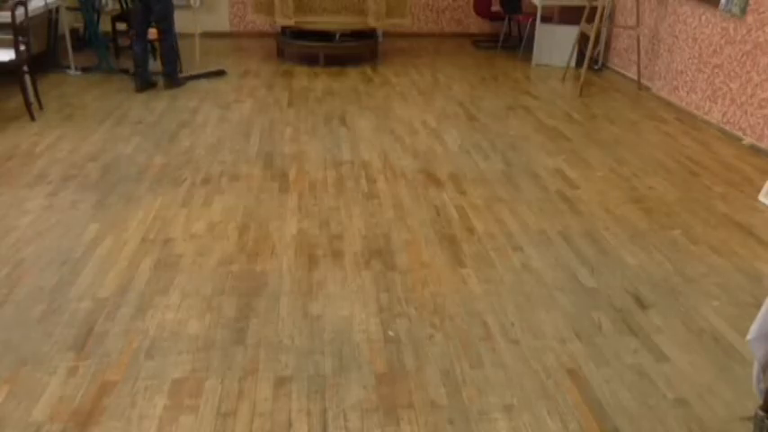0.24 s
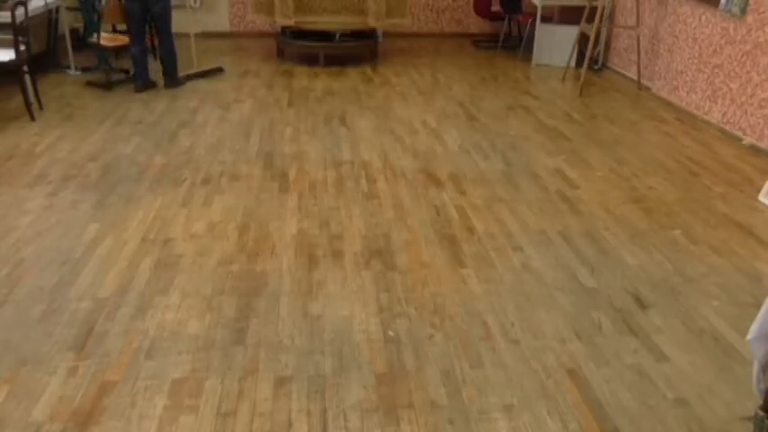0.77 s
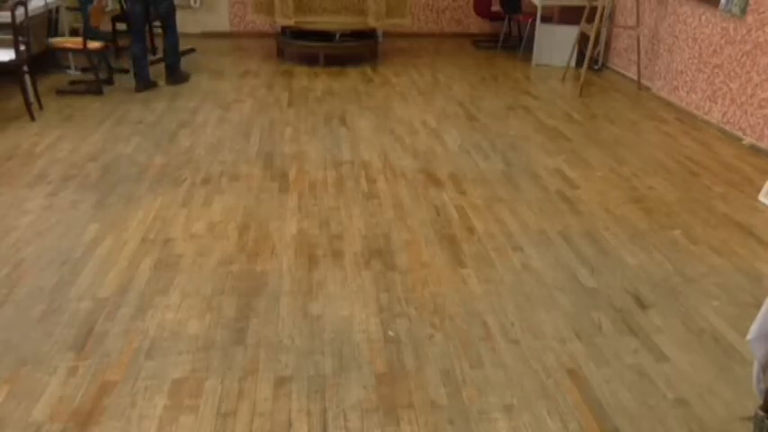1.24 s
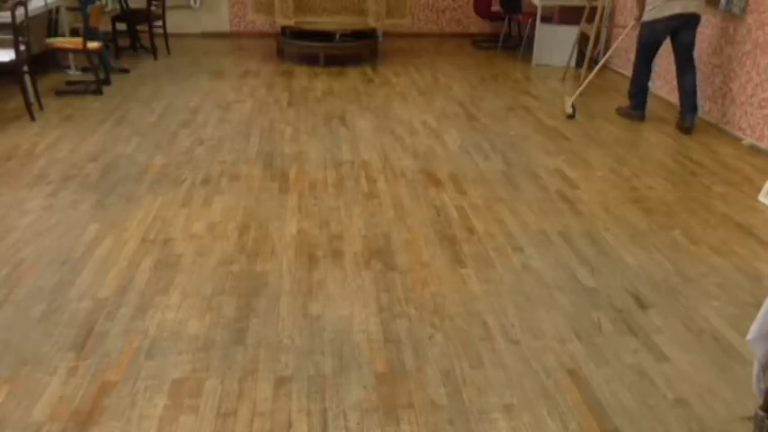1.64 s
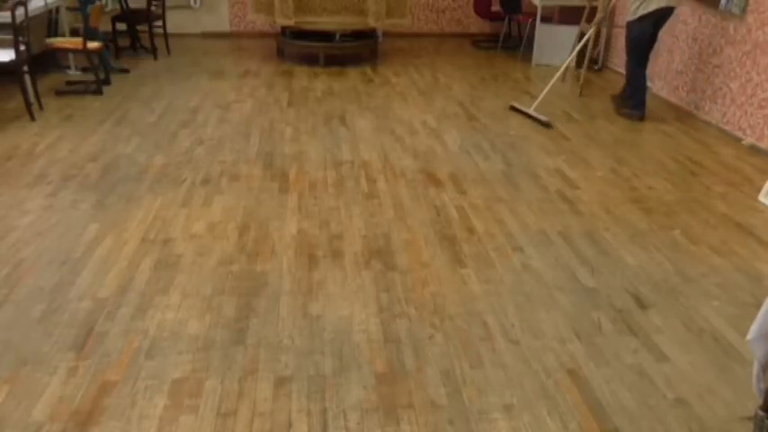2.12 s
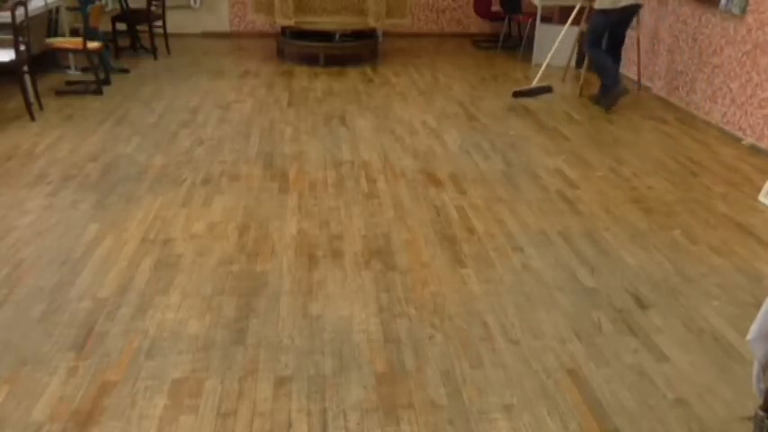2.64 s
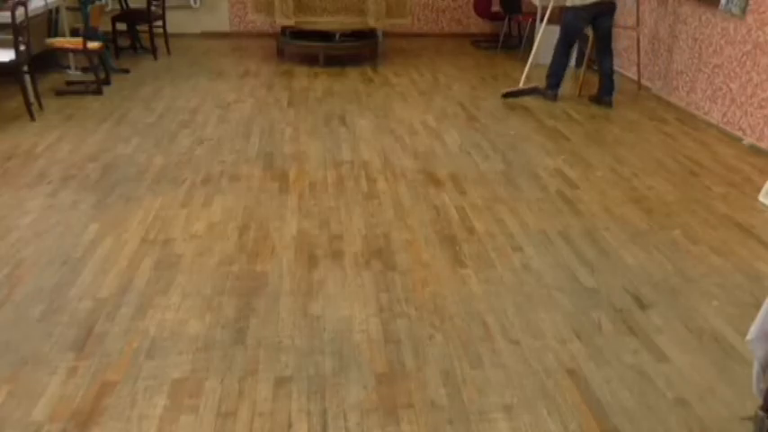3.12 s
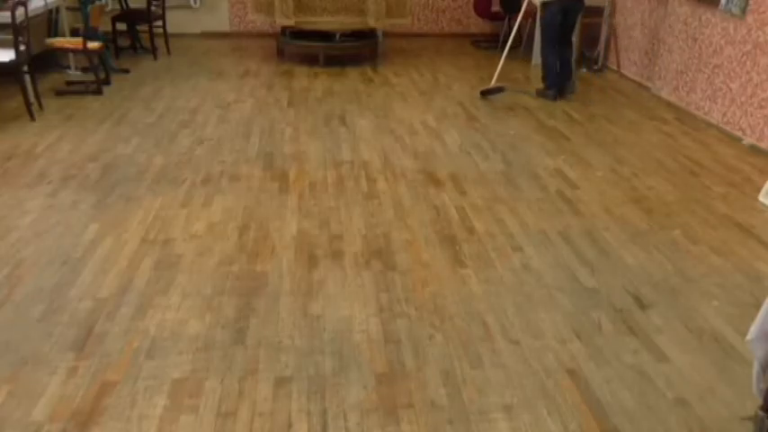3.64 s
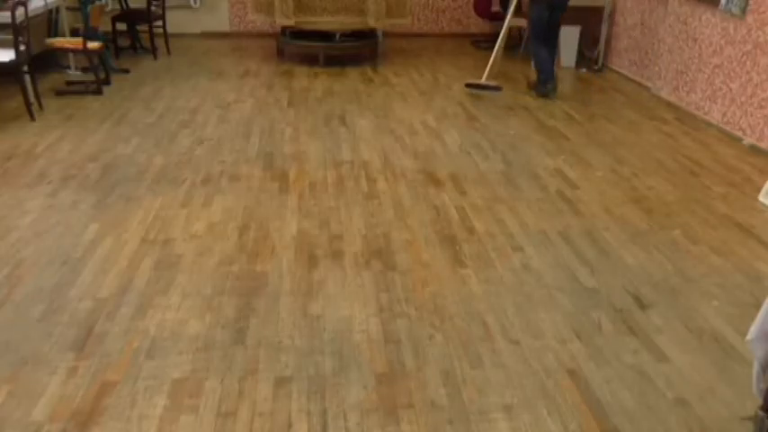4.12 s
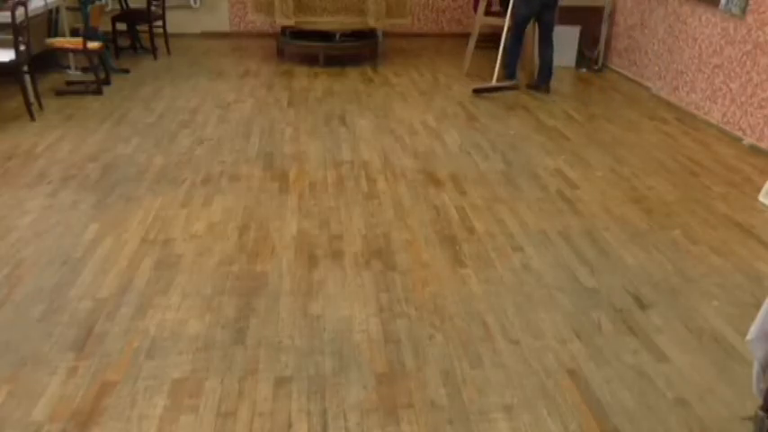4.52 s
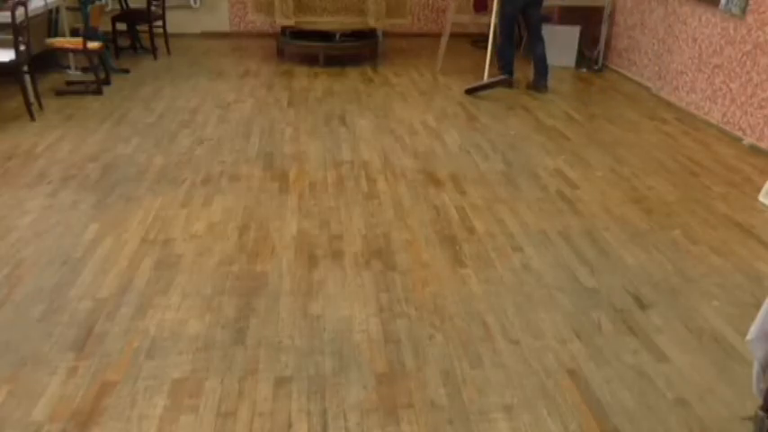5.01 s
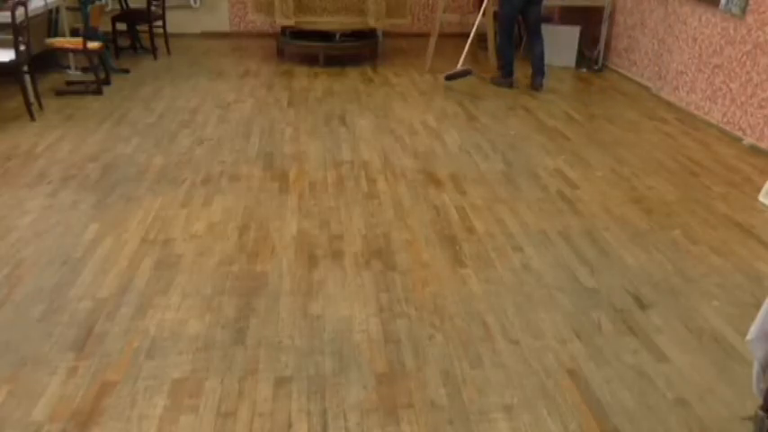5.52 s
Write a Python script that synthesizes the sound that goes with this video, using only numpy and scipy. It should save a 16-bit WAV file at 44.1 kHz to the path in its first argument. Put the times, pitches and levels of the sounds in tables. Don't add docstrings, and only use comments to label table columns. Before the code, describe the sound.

A push broom hisses and scrapes across a wooden floor in a large empty hall, with a burst of hard wooden knocks midway.

```python
import sys
import numpy as np
from scipy import signal
from scipy.fft import rfft, irfft, next_fast_len
from scipy.io import wavfile
from scipy.ndimage import uniform_filter1d

SR = 44100
rng = np.random.default_rng(int(sys.argv[2]) if len(sys.argv) > 2 else 0)


def wrap_up_sound(samples):
    columns = np.atleast_2d(samples).T
    tamed = np.clip(columns, -1, 1)
    steps = np.round(tamed * 32767).astype(np.int16)
    wavfile.write(sys.argv[1], SR, steps)


def volts_from_db(level):
    exponent = np.asarray(level, float) / 20
    return 10 ** exponent


N = 254456


def unit(x):
    return x / np.sqrt(np.mean(x ** 2) + 1e-20)


def peak_one(x):
    return x / np.abs(x).max()


def along(points, hz):
    f, value = np.transpose(points)
    return np.interp(np.log(hz + 1), np.log(f + 1), value)


def filtered(x, response):
    m = next_fast_len(x.shape[-1] + 8192)
    hz = np.fft.rfftfreq(m, 1 / SR)
    return irfft(rfft(x, m) * response(hz), m)[..., :x.shape[-1]]


def resonance(f, hz, width_hz):
    return 1j * f * width_hz / (hz * hz - f * f + 1j * f * width_hz)


def favoured(hz):
    # (frequency [Hz], width [Hz], lift [dB])
    standing_waves = [(157.6, 11, 3), (263, 22, 2), (334, 15, 3), (604, 17, 2.5), (724, 20, 0.5),
                      (860, 25, 1)]
    return volts_from_db(sum(db * np.abs(resonance(hz, c, w)) ** 2 for c, w, db in standing_waves))


def spread(pair, colour, apart):
    # (frequency [Hz], correlation [-1..1])
    likeness = [(60, 0.89), (150, 0.9), (300, 0.86), (600, 0.59), (1200, 0.57), (2400, 0.53), (5000, 0.69),
                (9000, 0.54), (15000, 0.64)]

    def mid_side(hz):
        angle = apart * np.arccos(np.clip(along(likeness, hz), -1, 1)) / 2
        return colour(hz) * [np.cos(angle), np.sin(angle)]

    mid, side = filtered(pair, mid_side)
    return np.array([mid + side, mid - side])


def pressure(s, rise_s, hold_s, db, fade_db_per_s):
    rise_from_db = -25
    t = np.arange(0, N + 32, 32)[:, None] / SR
    rise_db = rise_from_db * np.maximum(s - t, 0) / rise_s
    fade_db = fade_db_per_s * np.maximum(t - s - hold_s, 0)
    power = volts_from_db(2 * np.maximum(db + rise_db - fade_db, -150)).sum(axis=1)
    return np.interp(np.arange(N) / SR, t[:, 0], power)


def rub(spectrum, grain_db, grain_ms, patchy_db, apart=0.83):
    knots = rng.exponential(1, int(N / SR / grain_ms * 1000) + 2)
    grain = np.arange(N) / SR / grain_ms * 1000
    slips = volts_from_db(grain_db * np.interp(grain, np.arange(len(knots)), knots))
    z = signal.stft(slips * rng.standard_normal((2, N)), nperseg=512)[2]
    patches = uniform_filter1d(rng.standard_normal(z.shape[1:]), size=6, axis=0)
    patches = uniform_filter1d(patches, size=6, axis=1)
    pair = signal.istft(z * volts_from_db(patchy_db * unit(patches)), nperseg=512)[1][:, :N]
    return unit(spread(pair, lambda hz: volts_from_db(along(spectrum, hz)) * favoured(hz), apart))


def hall(stretch, seconds):
    # (frequency [Hz], t60 [s])
    t60_s = [(75, 0.88), (250, 0.98), (600, 0.57), (1500, 0.53), (4000, 0.42), (12000, 0.23)]
    hz, t, z = signal.stft(rng.standard_normal((2, int(seconds * SR))), SR, nperseg=256)
    decay = volts_from_db(-60 * t / (stretch * along(t60_s, hz)[:, None]))
    tail = signal.istft(z * decay, SR, nperseg=256)[1]
    build_up = 1 - np.exp(-np.arange(tail.shape[1]) / SR / 0.00028)
    tail = spread(tail * build_up, favoured, apart=0.58)
    return tail / np.linalg.norm(tail[0])


def add(track, s, blow, fed, stretch, seconds):
    heard = signal.fftconvolve(fed[None], hall(stretch, seconds), axes=1)
    heard[:, :len(blow)] += blow
    spot = track[:, round(s * SR):][:, :heard.shape[1]]
    spot += heard[:, :spot.shape[1]]


def broom():
    # (frequency [Hz], density [dB per Hz])
    bristles = [(1290, -1.5), (2200, -6), (3100, -3), (3870, 0), (4730, 0.5), (6390, -2.5), (7600, -10),
                (9000, -34), (12000, -70)]
    tips = [(3820, -21.5), (6500, -3.5), (9160, -3.5), (14100, -7), (15000, -13), (15700, -20)]
    head_edge = [(410, -17.5), (700, -3.5), (853, -5.5), (1070, -8.5), (1170, -4), (2060, -9.5),
                 (3200, -25), (4160, -32), (7040, -120)]
    boards = [(21, -55), (35, -23), (123, -8), (179, -13.5), (260, 0), (476, -5.5), (527, -7.5),
              (714, -8.5), (848, -15.5), (1100, -18.5), (1430, -80), (2420, -120)]
    # (full pressure from [s], held for [s], hiss [dB], tip fizz over hiss [dB], weight of the head [dB])
    strokes = [(0.07, 0.26, -62.5, -6.5, 2), (0.28, 0.23, -60.5, -3, 5), (0.55, 0.36, -54, -0.5, -7),
               (0.95, 0.17, -52, -2, -2.5), (1.2, 0.18, -55, -0.5, -9), (1.37, 0.066, -52, -2.5, -5),
               (1.48, 0.78, -49, -3, 8), (2.35, 0.04, -48.5, -2.5, -14), (2.41, 0.11, -43, -6, 9.5),
               (2.68, 0.13, -51, -4.5, 20.5), (2.88, 0.26, -46, -5, 4), (3.28, 0.41, -59.5, -14, -3),
               (3.8, 0.07, -52.5, -8, -7), (4.15, 0.12, -76, -17, 14), (5.1, 0.28, -75.5, 3, 11),
               (5.47, 0.2, -60.5, -12, 3)]
    # (peak time [s], rise [s], hiss [dB], tip fizz over hiss [dB])
    flicks = [(0.062, .008, -67, -9), (0.25, 0.0088, -51.5, -7), (0.27, 0.1, -56, -1),
              (0.36, 0.024, -59, 3.5), (0.635, 0.052, -49, 2.5), (0.7, .03, -46.5, -0.5),
              (0.832, 0.051, -38, 1.5), (0.937, 0.049, -48.5, -3), (1.468, .01, -49, -5),
              (1.545, 0.031, -39, -3), (1.6, .05, -49, -15), (1.933, 0.014, -43, 0),
              (2.18, 0.42, -46.5, -4), (2.399, 0.01, -34.5, -21), (2.468, 0.035, -34, -2.5),
              (2.53, 0.087, -37, -3), (2.664, 0.11, -38.5, -6.5), (2.8, 0.034, -39.5, -4),
              (2.834, .04, -43, -4.5), (3.022, 0.084, -45, -2), (3.436, 0.077, -53.5, -4.5),
              (3.775, 0.35, -45, -3.5), (3.904, 0.021, -41, -12), (4.376, 0.0084, -56.5, -2),
              (4.442, 0.1, -54.5, -13), (4.852, 0.042, -63, -6), (4.936, 0.023, -65, 1.5),
              (5.081, .015, -49, -9), (5.443, 0.037, -47.5, -4), (5.612, 0.14, -52.5, -5),
              (5.737, 0.052, -42.5, -9)]
    # (peak time [s], rise [s], scrape [dB], rumble over scrape [dB])
    shoves = [(0.252, 0.015, -48.5, -0.5), (0.642, 0.14, -48.5, 3.5), (0.826, 0.044, -45.5, -5),
              (1.362, 0.04, -56.5, 11.5), (1.471, 0.017, -45.5, 5.5), (1.578, 0.17, -56.5, 17.5),
              (1.833, 0.051, -40.5, -3), (2.012, 0.041, -35, 5.5), (2.172, 0.06, -40.5, 0.5),
              (2.375, 0.1, -48, -14), (2.468, 0.13, -32.5, 2.5), (2.562, 0.079, -35.5, -2),
              (2.834, 0.07, -39, 0), (3.076, 0.43, -47, -12), (3.2, .06, -63, -17), (3.69, .1, -49.5, 0.5),
              (4.39, 0.018, -52.5, 11), (4.715, .02, -63, -6), (4.841, 0.034, -60.5, 5),
              (4.95, .08, -76, 14), (5.09, .015, -51.5, -19), (5.15, .05, -60, -11),
              (5.447, 0.066, -47, -14), (5.582, 0.099, -46.5, 0), (5.742, .05, -47, -3)]
    s, hold_s, hiss_db, tips_db, weight_db = np.transpose(strokes)
    flick_s, flick_rise_s, flick_db, flick_tips_db = np.transpose(flicks)
    shove_s, shove_rise_s, shove_db, deep_db = np.transpose(shoves)

    def stroke(db):
        return pressure(s, 0.05, hold_s, db, fade_db_per_s=99)

    def flick(db, fade_db_per_s):
        return pressure(flick_s, flick_rise_s, 0, db, fade_db_per_s)

    def shove(db, fade_db_per_s):
        return pressure(shove_s, shove_rise_s, 0, db, fade_db_per_s)

    hiss = stroke(hiss_db) + flick(flick_db, 147)
    fizz = stroke(hiss_db + tips_db) + flick(flick_db + flick_tips_db, 197)
    scrape = stroke(hiss_db - 8 + 0.59 * weight_db) + shove(shove_db, 138)
    rumble = stroke(hiss_db + weight_db) + shove(shove_db + deep_db, 96)
    return (np.sqrt(hiss) * rub(bristles, grain_db=1.5, grain_ms=2.5, patchy_db=1.1)
            + np.sqrt(fizz) * rub(tips, grain_db=1.4, grain_ms=0.92, patchy_db=1.0, apart=1.06)
            + np.sqrt(scrape) * rub(head_edge, grain_db=1.5, grain_ms=4.5, patchy_db=2.0)
            + np.sqrt(rumble) * rub(boards, grain_db=0.03, grain_ms=13, patchy_db=2.0, apart=0.47))


def knocks():
    # (time [s], peak [dB], wood
    # pitch [Hz], hall answer [dB])
    wood_and_heels = [(0.246, -46, 520, 0), (1.537, -26.5, 322, 6.5), (1.8222, -24.5, 475, 0.5),
                      (1.8442, -30, 424, -4), (1.937, -28.5, 315, 3), (2.008, -28.5, 704, 4.5),
                      (2.169, -33.5, 570, 7.5), (2.42, -23.5, 333, 2), (2.461, -15, 696, 0),
                      (2.524, -23.5, 736, 3.5), (2.646, -11.5, 514, -1), (2.6555, -16, 805, -7),
                      (2.666, -10, 343, 1), (2.6725, -5.5, 390, -11), (2.6893, -13, 396, -6),
                      (2.715, -16, 328, -6.5), (3.4962, -26.5, 313, -1), (3.498, -28, 700, 5.5),
                      (3.598, -34.5, 310, 3), (4.373, -31.5, 226, 5.5), (4.432, -37, 298, -1.5),
                      (4.836, -46, 350, 4.5), (5.074, -48.5, 600, 6)]
    # (time [s], peak [dB], pitch [Hz], floor thud
    # [dB], hall answer [dB])
    clacks = [(0.822, -29.5, 1600, -15, 1), (1.466, -31, 860, -8, 0.5), (1.829, -29.5, 910, -11, -1),
              (2.065, -28, 1510, -9, 0), (2.649, -13.5, 930, -1, -0.5), (3.496, -25.5, 1140, -13, -3),
              (3.498, -27.5, 1650, -30, -9), (3.6, -35, 1490, -13, 0.5), (3.735, -18, 1530, -41, -1.5),
              (3.8022, -34.5, 1210, -2.5, 2.5), (3.831, -23.5, 1270, -14, -4),
              (3.897, -12.5, 1130, -21, -1), (3.918, -30, 1108, -27, -6), (4.372, -39.5, 1291, 2, -7),
              (4.429, -33.5, 1050, -2.5, -2.5), (4.43, -38.5, 1900, -30, 8), (4.837, -45.5, 1010, -16, 2.5),
              (5.074, -42, 1100, -35, 6.5), (5.445, -37, 1330, -25, 4), (5.573, -32.5, 1140, -15.5, 0.5)]
    # (frequency [Hz], width [Hz], level [dB])
    floor_modes = [(75, 5.6, -9), (143.3, 30, -5), (271, 42.4, 2), (335, 65, 0.5), (502, 450, -4.5)]
    track, t = np.zeros((2, N)), np.arange(4096) / SR
    push = np.exp(-((t - 0.0006) / 0.0001) ** 2)

    def floor_response(f):
        modes = sum((-1) ** k * volts_from_db(db) * resonance(f, c, w) for k, (c, w, db) in enumerate(floor_modes))
        return modes * np.exp(-(f / 1500) ** 2)

    thud = peak_one(filtered(push, floor_response))
    blows = []
    for s, db, hz, wet_db in wood_and_heels:
        thud_db = -9 - 3.5 * np.log2(hz / 300)
        blows.append((s, db, hz, thud_db, wet_db, 0.82))
    blows += [(*row, 0.85) for row in clacks]
    for s, db, hz, thud_db, wet_db, stretch in blows:
        ring = filtered(push, lambda f: resonance(f, hz, 0.78 * hz) ** 4 * np.exp(-(f / (2.8 * hz)) ** 2))
        body = filtered(push, lambda f: resonance(f, 0.81 * hz, 1.56 * hz) ** 2
                        * np.exp(-(f / (3.8 * hz)) ** 2))
        ring, body = peak_one(ring), peak_one(body)
        floor = volts_from_db(thud_db + 6.0) * thud
        direct = volts_from_db(db) * (ring + 0.21 * body + floor)
        fed = volts_from_db(db + wet_db) * (0.41 * ring + 0.84 * body + 0.91 * floor)
        add(track, s, direct, fed, stretch, seconds=0.55)
    return track


def ticks():
    # (time [s], peak [dB], sparkle [dB])
    snaps = [(0.062, -42.5, -11), (0.2123, -52, 6), (0.356, -53, -4), (0.5305, -40, -5), (0.5474, -47, -6),
             (0.6142, -38, -6), (0.6305, -39, 3), (0.6518, -32, -1), (0.8094, -33, -6),
             (0.8214, -22.5, 0.5), (0.833, -20.5, -5), (0.9345, -29, -6), (1.5389, -22.5, -3.5),
             (2.3354, -42, 1), (3.0153, -29, -6)]
    # (time [s], peak [dB], pitch [Hz], sparkle [dB])
    grit = [(0.6964, -32.5, 4200, -14), (0.71, -33.5, 4150, -17), (1.4654, -23.5, 3680, -22),
            (1.653, -28, 5240, -14), (1.932, -29, 3270, -6), (2.0665, -28, 4340, -24),
            (2.255, -43, 5100, -16), (2.396, -18, 5100, -23), (2.401, -26, 2180, -30),
            (2.455, -20, 4570, -17), (2.4632, -23.5, 3600, -8), (2.506, -23, 4440, -17),
            (2.519, -25, 3940, -15), (2.543, -22, 4070, -15), (2.6666, -36, 4980, -22),
            (2.7918, -25, 5840, -16), (2.816, -25, 6030, -12), (2.8305, -22, 4100, -18),
            (3.273, -34.5, 5470, -29), (3.74, -30, 4730, -18), (3.865, -33, 4270, -24),
            (3.896, -26.5, 3420, -22), (3.9125, -28, 4900, -26), (5.0745, -29, 3770, -30),
            (5.076, -33, 4200, -7), (5.0898, -44, 4500, -20), (5.444, -33.5, 5000, -5),
            (5.45, -29.5, 3830, -25), (5.5368, -30.5, 2740, -30), (5.5738, -32, 2320, -22),
            (5.5748, -32.5, 6560, -22), (5.581, -29.5, 3600, -29), (5.685, -43, 2860, -10)]
    snap_hz, hall_db = 5400, -1
    track, t = np.zeros((2, N)), np.arange(512) / SR
    grains = [(s, db, snap_hz, top_db) for s, db, top_db in snaps] + list(grit)
    for s, db, hz, top_db in grains:
        snap = rng.standard_normal(len(t)) * volts_from_db(-60 * t / 0.0045) * (1 - np.exp(-t / 0.0003))
        snap[3] += 3
        core = filtered(snap, lambda f: resonance(f, hz, 0.99 * hz) ** 2 * np.exp(-(f / (2.1 * hz)) ** 2))
        sparkle = filtered(snap, lambda f: resonance(f, 10900, 5700) ** 3)
        tick = volts_from_db(db + 3.0) * (peak_one(core) + volts_from_db(top_db) * peak_one(sparkle))
        add(track, s, tick, volts_from_db(hall_db) * tick, stretch=0.4, seconds=0.25)
    return track


def joists():
    # (time [s], frequency [Hz], level [dB], t60 [s], damped at [s])
    booms = [(1.72, 52.3, -46, .6, 2.1), (2.649, 75, -38, 0.64, 3.2), (3.501, 108, -37, 0.52, 3.8),
             (3.809, 75, -53, 0.69, 4.1), (2.672, 263, -26, .8, 3.1), (2.68, 330, -26, .75, 3.1),
             (2.672, 160, -28, .7, 3.1), (4.376, 50.3, -50, 1.3, 4.8), (4.373, 124.5, -34.5, 0.52, 5.1),
             (4.376, 75, -42, 1.8, 4.82), (5.076, 520, -48, 0.66, 5.18)]
    t = np.arange(N) / SR
    track = np.zeros(N)
    for s, hz, db, t60_s, end_s in booms:
        since = np.maximum(t - s, 0)
        envelope = volts_from_db(-60 * since / t60_s) * (1 - np.exp(-since / 0.011))
        damping = np.clip((end_s - t) / 0.022, 0, 1)
        track += volts_from_db(db) * envelope * np.sin(2 * np.pi * hz * since) * damping
    return track


def air():
    # (frequency [Hz], density [dB per Hz])
    running_hush = [(15, -47), (25, -45), (53, -13), (134, 7.5), (190, -5.5), (256, -3.5), (560, -8.5),
                    (2410, -13), (2610, -20), (4610, -18.5), (6920, -22.5), (14400, -28), (16000, -36)]
    late_hush = [(15, -75), (25, -49.5), (82, -1.5), (242, -3), (285, -12), (1330, -15), (1440, -16),
                 (3160, -18), (16000, -37)]
    # (frequency [Hz], width [Hz], level [dB], starts [s], stops [s])
    machine = (2410, 45, -76, 4.2, 5.074)
    hz, width_hz, whine_db, start_s, stop_s = machine
    t = np.arange(N) / SR
    whine = unit(filtered(rng.standard_normal(N), lambda f: resonance(f, hz, width_hz) ** 2))
    running = volts_from_db(-56) * rub(running_hush, grain_db=0.0, grain_ms=27, patchy_db=0.8, apart=1.5)
    running = running + volts_from_db(whine_db) * whine * (t > start_s)
    late = volts_from_db(-55) * rub(late_hush, grain_db=0.9, grain_ms=30, patchy_db=2.0, apart=1.43)
    return np.where(t < stop_s, running, late)


def scene():
    return broom() + knocks() + ticks() + joists() + air()


def band_limit(x):
    return signal.sosfilt(signal.butter(12, 16480, fs=SR, output="sos"), x)


def record(dry):
    # (frequency [Hz], gain [dB])
    housing = [(20, -19), (45, -6.5), (70, -3), (2300, 0.5), (2850, -2.5), (3500, 0), (15700, 0),
               (15900, -38.5)]
    # (frequency [Hz], left minus right [dB])
    lean = [(60, -2.5), (150, 0), (380, -1), (950, 0), (2380, -1), (5980, -1), (9000, -2.5), (11500, -5),
            (15000, 4.5)]
    # (from [s], to [s])
    silence = (3.7801, 3.8013)
    sides = np.array([[1], [-1]])
    x = filtered(dry, lambda hz: volts_from_db(along(housing, hz) + along(lean, hz) / 2 * sides))
    t = np.arange(N) / SR
    kept = (t < silence[0]) | (t > silence[1])
    return band_limit(x * kept)


dry = scene()
out = record(dry)
wrap_up_sound(out)
```